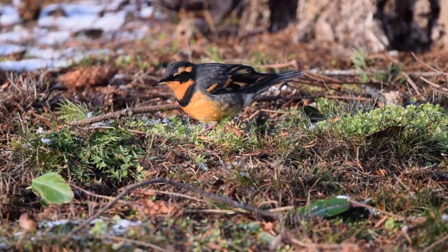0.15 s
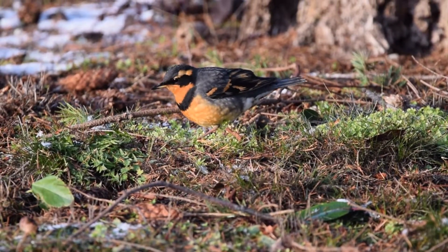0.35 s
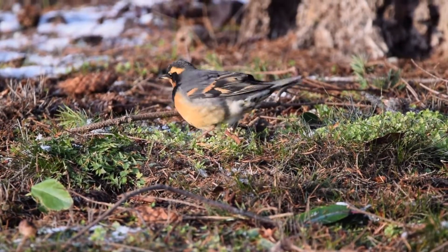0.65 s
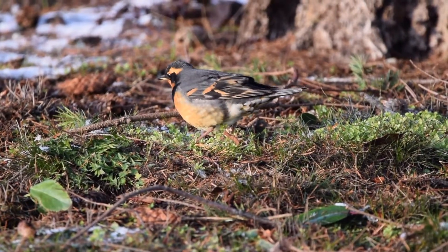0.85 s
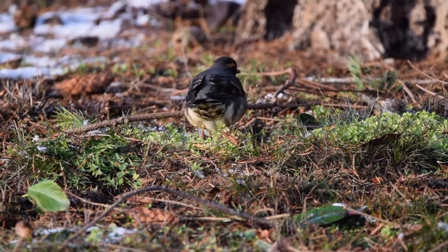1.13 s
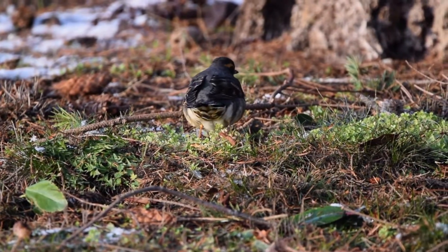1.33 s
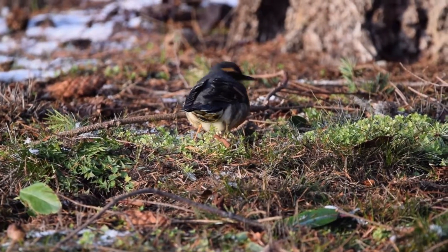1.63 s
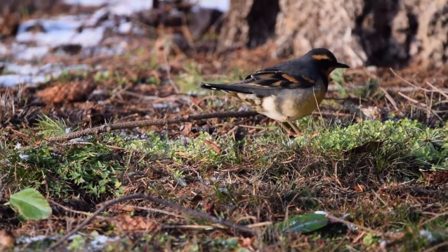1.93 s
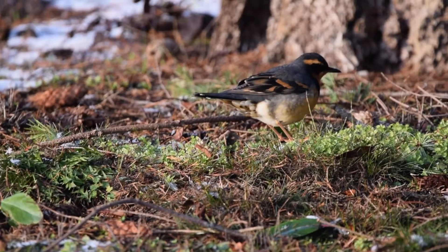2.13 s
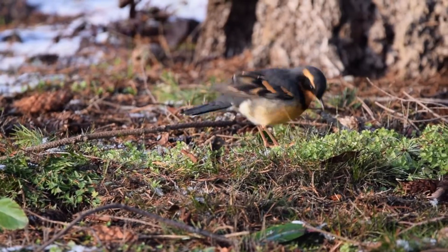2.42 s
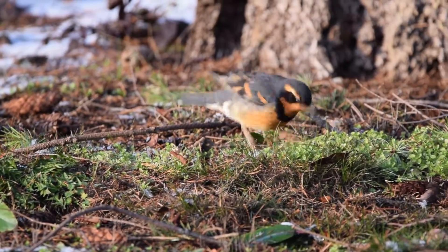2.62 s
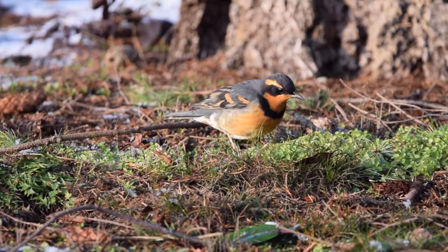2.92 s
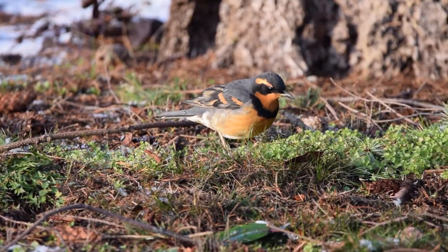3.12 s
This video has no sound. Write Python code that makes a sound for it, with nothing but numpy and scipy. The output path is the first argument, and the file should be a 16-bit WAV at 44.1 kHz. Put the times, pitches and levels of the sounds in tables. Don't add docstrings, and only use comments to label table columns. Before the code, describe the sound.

A hidden crow caws hoarsely twice in the last second, lightly echoed by trees, in open ground near a town; steady far tyre roar, sparse needle and twig snaps, low wind thumps and faint microphone hiss.

```python
import sys
import numpy as np
from scipy import signal
from scipy.io import wavfile
from scipy.ndimage import uniform_filter1d

SR = 44100
rng = np.random.default_rng(int(sys.argv[2]) if len(sys.argv) > 2 else 0)


def pcm_store(signal):
    levels = np.round(np.clip(np.atleast_2d(signal), -1, 1) * 32767)
    wavfile.write(sys.argv[1], SR, levels.astype(np.int16).T)


def level_to_linear(level):
    exponent = np.asarray(level, float) / 20
    return 10 ** exponent


N = 143766

# start in seconds, length in seconds, level in dB, pitch factor, extra rasp in dB.
CAWS = [
    (2.402, 0.281, -40.8, 1.015, 6),
    (2.902, 0.285, -39, 0.985, 1),
]
# time after start in seconds, pitch in Hz.
CAW_PITCH = [
    (0, 218),
    (.016, 227),
    (.038, 232),
    (.047, 246),
    (.095, 247),
    (.14, 231),
    (.2, 221),
    (.27, 214),
]
# centre in Hz, width in Hz, level in dB, fading in dB per s, sinking share per s.
THROAT = [
    (1235, 240, -11.5, 18, .1),
    (1490, 220, 0, 0, .2),
    (1735, 240, -2.5, 18, .17),
    (2190, 240, -4, 28, .33),
]
# lag in seconds, level in dB.
ECHOES = [
    (.06, -22),
    (.108, -15),
    (.17, -20),
]
# time in seconds, peak in dB, pitch in Hz, ring in cycles.
SNAPS = [(.058, -64, 5500, 8), (.074, -62, 5500, 8), (.127, -63, 5500, 8), (0.848, -51, 4200, 4.5),
         (0.87, -52, 4600, 3.3), (.962, -57, 9000, 8), (1.568, -86, 9000, 8), (1.602, -59, 5000, 8),
         (1.681, -61, 7960, 9.1), (1.895, -50, 5270, 7.5), (1.963, -58, 6050, 84), (1.887, -62, 10500, 4),
         (2.09, -64, 9000, 40), (2.56, -64, 9600, 40), (2.6, -62, 9500, 8), (2.652, -61, 9000, 8),
         (2.051, -59, 9200, 10), (2.062, -52, 9000, 4.6), (2.069, -60, 10600, 3.7),
         (2.081, -49.5, 4780, 11.4), (2.109, -50.5, 9600, 4), (2.207, -53, 5100, 10), (2.34, -61, 8200, 15),
         (2.521, -54, 8300, 4.4), (2.549, -55, 7900, 3.5), (2.552, -53, 9300, 5), (2.571, -50, 5870, 2.6),
         (2.585, -55, 8800, 6), (2.641, -49.5, 5500, 4.3), (2.644, -56.5, 10000, 4), (2.839, -55, 4900, 10),
         (2.86, -63, 9070, 8), (3.242, -62, 6500, 4), (3.256, -62, 6500, 5)]
# centre in seconds, peak in dB, pitch in Hz, width in seconds.
EDDIES = [(0.024, -50, 131, 0.016), (0.058, -44.5, 164, 0.013), (0.08, -45.5, 124.4, 0.029),
          (0.141, -46, 153, 0.0093), (0.272, -53.5, 120.6, 0.023), (0.468, -50.5, 107.7, 0.0087),
          (0.509, -52.5, 82, 0.026), (0.559, -53, 86.3, 0.027), (0.733, -55, 95, 0.015),
          (0.799, -53, 84.7, 0.026), (.965, -68, 80, .015), (.99, -59, 96.3, 0.017),
          (1.02, -62, 69.8, 0.018), (1.185, -57, 96, 0.015), (1.3, -63, 70, .02), (1.33, -59, 90, .014),
          (1.263, -49, 76, 0.022), (1.389, -43.5, 92.8, 0.01), (1.418, -46.5, 94.7, 0.011),
          (1.449, -54, 106.3, 0.025), (1.524, -51.5, 118.4, 0.0091), (1.623, -49.5, 91.4, 0.016),
          (1.648, -49, 86.7, 0.019), (1.776, -54.5, 106.2, 0.016), (1.8, -55, 75.6, 0.014),
          (1.89, -70, 91, 0.013), (2.09, -57, 74, 0.015), (2.115, -61, 80, 0.015), (2.35, -62, 78, 0.03),
          (2.049, -67, 94, 0.026), (2.452, -51, 110.5, 0.0078), (2.481, -49, 83, 0.011),
          (2.501, -45.5, 131.2, 0.014), (2.538, -49.5, 189.2, 0.016), (2.6, -57, 103.7, 0.017),
          (2.72, -64, 88.5, 0.014), (2.79, -57, 81, 0.028), (2.885, -55, 84.3, 0.014),
          (2.94, -50, 111.4, 0.022), (2.99, -51, 81, 0.017), (3.145, -60, 80.5, .018),
          (2.825, -50, 85.4, 0.048), (2.864, -53.5, 112, 0.021), (2.911, -46, 98, 0.0092),
          (2.972, -36.5, 92.1, 0.021), (3.116, -53, 84, 0.026)]
# centre in seconds, peak in dB, pitch in Hz, width in seconds.
FLICKS = [(.115, -52.5, 700, 0.017), (.128, -50, 262, 0.0083), (.495, -59, 223, 0.0088),
          (2.541, -48, 257.8, 0.012), (2.546, -48, 405, 0.0058), (2.968, -45.5, 150.5, .018),
          (.095, -54.5, 230, 0.013), (2.974, -47.5, 199, 0.015), (2.979, -51.5, 319, 0.0037)]
# time in seconds, level in dB.
TRAFFIC_SWELL = [(0, -52.5), (.2, -53), (.6, -53), (.74, -51), (.87, -50), (.95, -50), (1.1, -50.5),
                 (1.25, -50.5), (1.4, -50.5), (1.6, -51), (1.9, -51), (2.3, -50.5), (2.6, -51), (2.85, -53),
                 (3.26, -52)]
# frequency in Hz, density in dB per Hz.
TRAFFIC_COLOUR = [(200, -14.5), (320, -7), (525, -6), (913, 0.5), (1610, 2.5), (2600, -6.5), (4200, -15),
                  (12000, -39.5)]
# frequency in Hz, density in dB per Hz.
HISS_COLOUR = [(200, -11.5), (500, -4.5), (1300, -8), (3000, 1.5), (6000, -7), (10000, -12), (15500, -25)]

RATTLE_PER_S, RATTLE_SLOWING_PER_S2, RATTLE_LAG_S = 52.5, 27, .0455
RATTLE_SWING_SHARE, RATTLE_GROWTH_PER_S, RATTLE_SWELL_DB = .1, .22, 2.5
JITTER_SHARE, SHIMMER_DB = .008, 2.3
RASP_DB, RASP_RISE_DB_PER_S, ONSET_RASP_DB, ONSET_RASP_S = -20, 32, 14, .018
BILL_SHUT_SHARE, BILL_OPENS_S, BILL_SWING_S = .065, .05, .016
VALLEY_HZ, VALLEY_WIDTH_HZ, VALLEY_DEPTH = 1885, 80, .5
ATTACK_S, ONSET_DB, FADE_DB_PER_S, RELEASE_S = .038, -11, 12.5, .034
WOODS_T60_S, WOODS_DB, WOODS_SIDE_DB, CROW_PAN_DB = .7, -19, -19, -1.1
EDDY_EDGE_PITCH_SHARE, EDDY_RUMBLE_DB = .55, -15
EDDY_TILT_DB, FLICK_TILT_DB = .6, 5.1
BREEZE_DB, BREEZE_SIDE_DB, BREEZE_LUMP_DB = -68, -11, 2
TRAFFIC_FLUTTER_DB, TRAFFIC_SIDE_DB, TRAFFIC_PAN_DB = .47, -22, -.3
TOWN_HZ, TOWN_WIDTH_HZ, TOWN_DB, TOWN_FADE_DB_PER_S = 797, 360, -61, 4
HISS_DB, WHINE_HZ, WHINE_DB, OFFSET = -62, 10013, -98, -.00294
SIDES = np.array([[1], [-1]])


def crow():
    direct = np.zeros(N + SR)
    for start_s, length_s, db, factor, rasp_db in CAWS:
        voice = level_to_linear(db) * caw(length_s, factor, rasp_db)
        direct[int(start_s * SR):][:len(voice)] += voice
    t = np.arange(SR // 2) / SR
    decay = level_to_linear(-60 * t / WOODS_T60_S) * rng.standard_normal((2, len(t)))
    answer = level_to_linear(WOODS_DB) * rms_one(decay) / np.sqrt(len(t))
    for lag_s, db in ECHOES:
        smear = np.exp(-((t - lag_s) / .004) ** 2) * rng.standard_normal((2, len(t)))
        answer = answer + level_to_linear(db) * smear / np.sqrt(np.sum(smear ** 2) / 2)
    mid, side = signal.fftconvolve(direct[None], answer)[:, :N]
    return (direct[:N] + mid) * level_to_linear(CROW_PAN_DB / 2 * SIDES) + level_to_linear(WOODS_SIDE_DB) * side * SIDES


def caw(length_s, factor, rasp_db):
    t = np.arange(int(.3 * SR)) / SR
    kick = rattle(t)
    hz = factor * np.interp(t, *np.transpose(CAW_PITCH))
    swing = (RATTLE_SWING_SHARE + RATTLE_GROWTH_PER_S * t) * kick
    hz = hz * (1 + swing + JITTER_SHARE * drift(92, size=len(t)))
    phase = 2 * np.pi * np.cumsum(hz) / SR
    k = np.arange(4, 13)[:, None]
    flutter = level_to_linear(SHIMMER_DB * np.array([drift(86, size=len(t)) for _ in k]))
    partials = np.cos(k * phase + 2 * np.pi * rng.random(k.shape))
    tone = (throat_gain(t, k * hz) * flutter * partials).sum(axis=0)
    onset_db = ONSET_RASP_DB * np.exp(-t / ONSET_RASP_S)
    rasp_gain = level_to_linear(RASP_DB + rasp_db + RASP_RISE_DB_PER_S * t + onset_db)
    voice = rms_one(tone) + rasp_gain * rms_one(throat_rasp(t, phase))
    attack = np.clip(t / .0075, 0, 1) * level_to_linear(ONSET_DB * np.clip(1 - t / ATTACK_S, 0, 1))
    release = np.clip((length_s - t) / RELEASE_S, 0, 1) ** 1.6
    return voice * attack * release * level_to_linear(RATTLE_SWELL_DB * kick - FADE_DB_PER_S * t)


def rattle(t):
    u = t - RATTLE_LAG_S
    kick = 1 - np.abs(np.sin(np.pi * (RATTLE_PER_S * u - RATTLE_SLOWING_PER_S2 * u ** 2)))
    return uniform_filter1d(kick - .36, size=90) * np.clip(u * RATTLE_PER_S * 2 + 1, 0, 1)


def throat_gain(t, hz):
    bill = 1 - BILL_SHUT_SHARE * np.clip((BILL_OPENS_S - t) / BILL_SWING_S, 0, 1)
    power = 0
    for centre_hz, width_hz, db, fade, sag in THROAT:
        detune = 2 * (hz - centre_hz * (bill - sag * t)) / width_hz
        power = power + level_to_linear(2 * (db - fade * t)) / (1 + detune ** 2) ** 2
    valley = VALLEY_DEPTH * np.exp(-((hz - VALLEY_HZ) / VALLEY_WIDTH_HZ) ** 2)
    return np.sqrt(power) * (1 - valley)


def throat_rasp(t, phase):
    breath = rng.standard_normal(len(t)) * (1 + np.cos(phase))
    return sum(level_to_linear(db - fade * t) * resonance_twice(breath, hz * (1 - sag / 6), width_hz)
               for hz, width_hz, db, fade, sag in THROAT)


def litter():
    out, t = np.zeros((2, N + SR)), np.arange(1500) / SR
    for (at_s, db, hz, cycles), noise in zip(SNAPS, rng.standard_normal((len(SNAPS), 2, len(t)))):
        crush_s = .0011 + .5 * cycles / hz
        crush = (noise[0] + .9 * noise) * np.exp(-((t - 2 * crush_s) / crush_s) ** 2)
        snap = resonance_twice(crush, hz, 2.4 * hz / cycles)
        out[:, int((at_s - 2 * crush_s) * SR):][:, :len(t)] += level_to_linear(db) * snap / np.abs(snap).max()
    return out[:, :N]


def wind():
    wobbles, swell = eddies(EDDIES, EDDY_TILT_DB)
    flicks, _ = eddies(FLICKS, FLICK_TILT_DB)
    low = signal.butter(2, [42, 105], "band", fs=SR, output="sos")
    rumble = rms_one(signal.sosfilt(low, rng.standard_normal((2, N))))
    mid, side = rumble * (level_to_linear(BREEZE_DB + BREEZE_LUMP_DB * drift(8.1)) + level_to_linear(EDDY_RUMBLE_DB) * swell)
    return wobbles + flicks + mid + level_to_linear(BREEZE_SIDE_DB) * side * SIDES


def eddies(rows, tilt_db):
    t, out, swell = np.arange(N) / SR, np.zeros((2, N)), np.zeros(N)
    for (at_s, db, hz, width_s), (turn, tilt) in zip(rows, rng.random((len(rows), 2))):
        near = slice(max(int((at_s - .1) * SR), 0), int((at_s + .066) * SR))
        bump = np.exp(-np.log(16) * ((t[near] - at_s) / width_s) ** 2)
        skew_db = tilt_db * (tilt - .5) * SIDES
        pitch_hz = hz * (EDDY_EDGE_PITCH_SHARE + (1.1 - EDDY_EDGE_PITCH_SHARE) * bump)
        phase = 2 * np.pi * (np.cumsum(pitch_hz) / SR + turn + skew_db / 25)
        out[:, near] += level_to_linear(db + skew_db) * bump ** .45 * (np.cos(phase) + .12 * np.cos(2 * phase))
        swell[near] += level_to_linear(db) * bump ** .39
    return out, swell


def traffic():
    t = np.arange(N) / SR
    swell_db = np.interp(t, *np.transpose(TRAFFIC_SWELL)) + TRAFFIC_FLUTTER_DB * drift(16)
    mid, side = coloured(TRAFFIC_COLOUR, patchy_db=.25, channels=2) * level_to_linear(swell_db)
    town = rms_one(resonance_twice(rng.standard_normal(N), TOWN_HZ, TOWN_WIDTH_HZ))
    mid = mid + town * level_to_linear(TOWN_DB - TOWN_FADE_DB_PER_S * t)
    return mid * level_to_linear(TRAFFIC_PAN_DB / 2 * SIDES) + level_to_linear(TRAFFIC_SIDE_DB) * side * SIDES


def coloured(colour, patchy_db, channels):
    out, edges_hz = 0, 140 * 2 ** np.arange(0, 7.1, .5)
    white = rng.standard_normal((2, channels, N))
    at_hz, density_db = np.transpose(colour)
    for k, (low, high) in enumerate(zip(edges_hz, edges_hz[1:])):
        band = signal.sosfilt(signal.butter(2, [low, high], "band", fs=SR, output="sos"), white[k % 2])
        db = np.interp(np.log(low * high) / 2, np.log(at_hz), density_db)
        out = out + band * level_to_linear(db + patchy_db * drift(3.7))
    return rms_one(out)


def resonance(x, hz, width_hz):
    r = np.exp(-np.pi * width_hz / SR)
    poles = [1, -2 * r * np.cos(2 * np.pi * hz / SR), r * r]
    return signal.lfilter([(1 - r * r) / 2, 0, (r * r - 1) / 2], poles, x)


def resonance_twice(x, hz, width_hz):
    return resonance(resonance(x, hz, width_hz), hz, width_hz)


def drift(rate_hz, size=N):
    r = np.exp(-2 * np.pi * rate_hz / SR)
    settle = SR // 2
    wander = signal.lfilter([1], [1, -2 * r, r * r], rng.standard_normal(size + settle))
    return rms_one(wander[settle:])


def rms_one(x):
    return x / np.sqrt(np.mean(x ** 2) + 1e-20)


def scene():
    return crow() + litter() + wind() + traffic()


def roll_off(x):
    return signal.sosfilt(signal.butter(12, 15700, fs=SR, output="sos"), x)


def record(dry):
    hiss = level_to_linear(HISS_DB) * coloured(HISS_COLOUR, patchy_db=.1, channels=2)
    whine = level_to_linear(WHINE_DB) * np.sqrt(2) * np.sin(2 * np.pi * WHINE_HZ * np.arange(N) / SR)
    bass_cut = signal.butter(1, 40, "high", fs=SR, output="sos")
    mix = signal.sosfilt(bass_cut, dry + hiss + whine) + OFFSET
    return roll_off(mix)


dry = scene()
out = record(dry)
pcm_store(out)
```